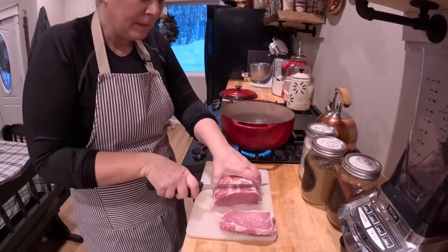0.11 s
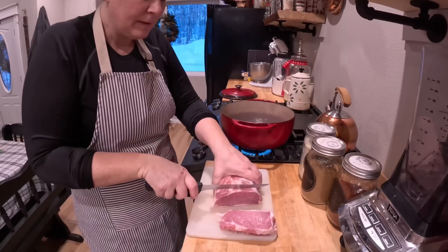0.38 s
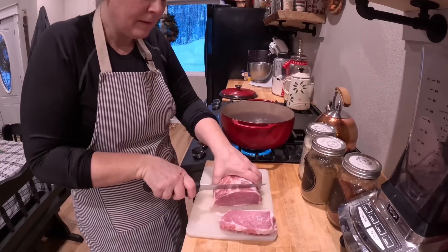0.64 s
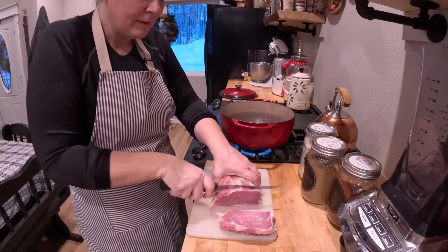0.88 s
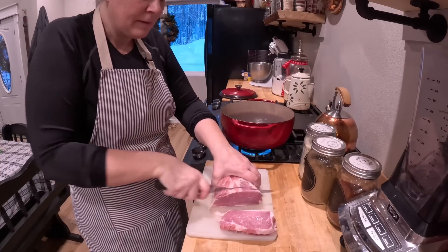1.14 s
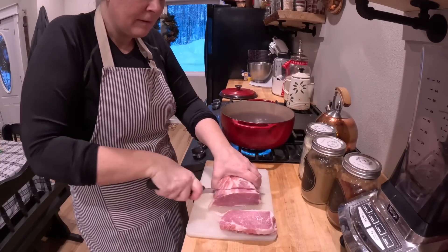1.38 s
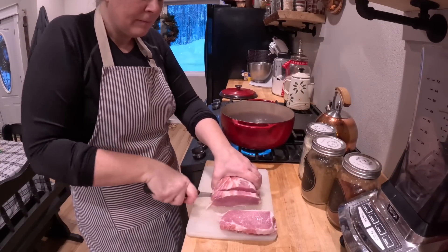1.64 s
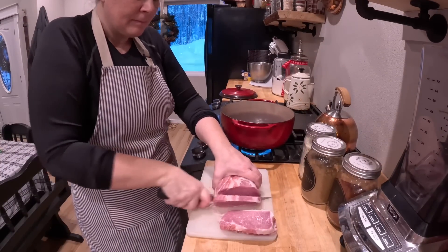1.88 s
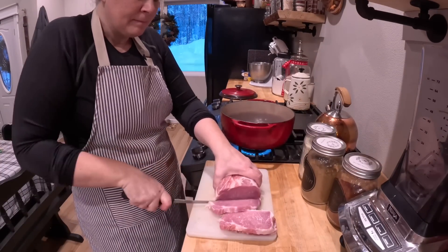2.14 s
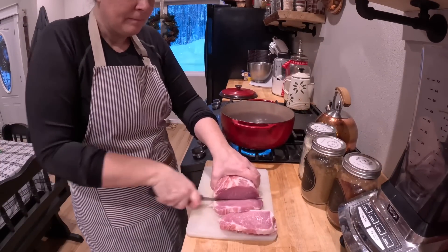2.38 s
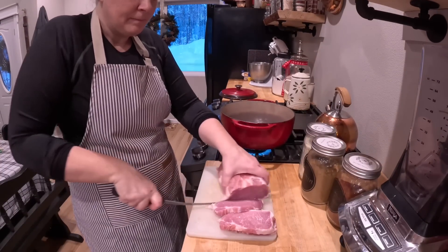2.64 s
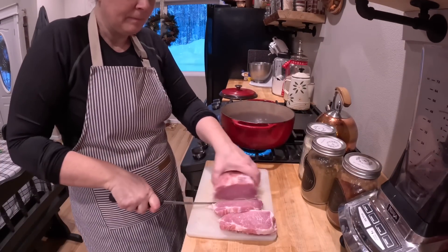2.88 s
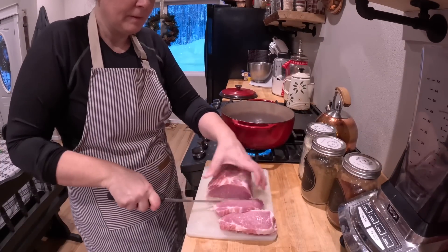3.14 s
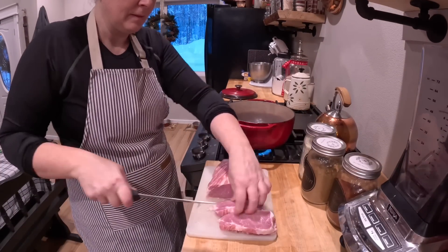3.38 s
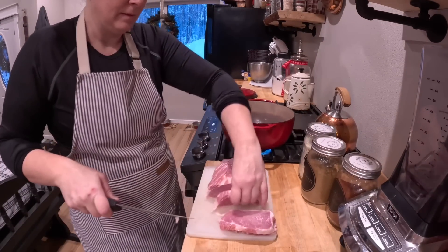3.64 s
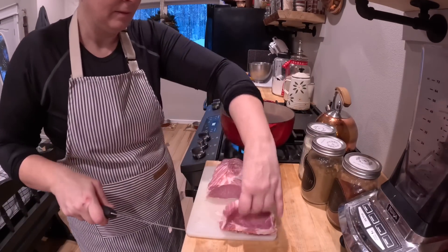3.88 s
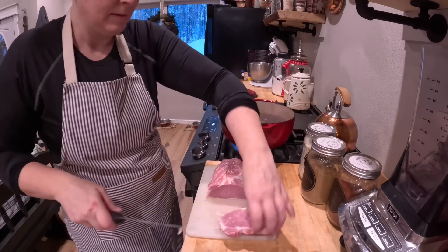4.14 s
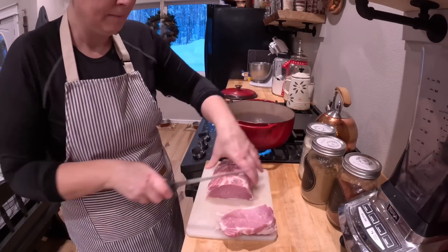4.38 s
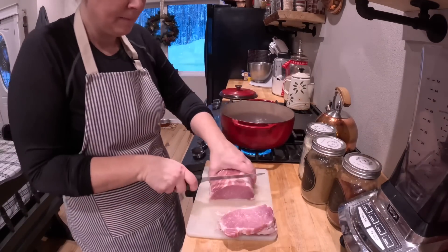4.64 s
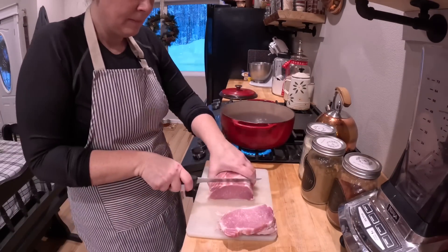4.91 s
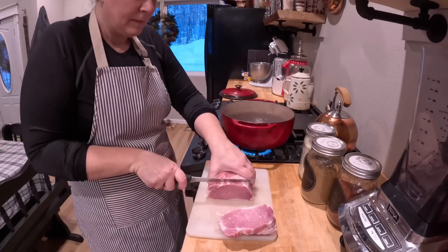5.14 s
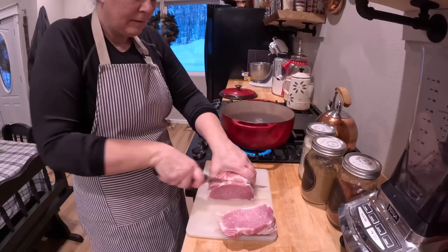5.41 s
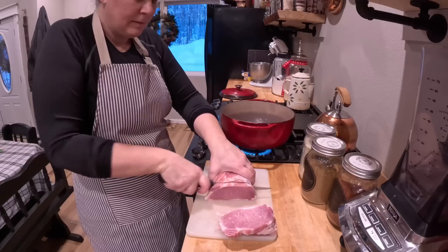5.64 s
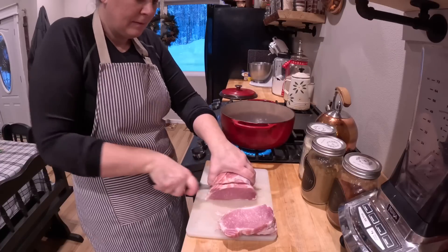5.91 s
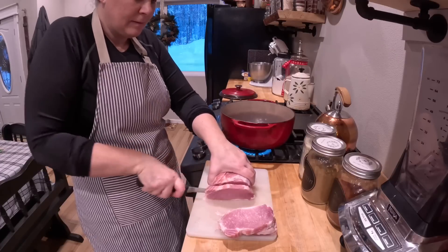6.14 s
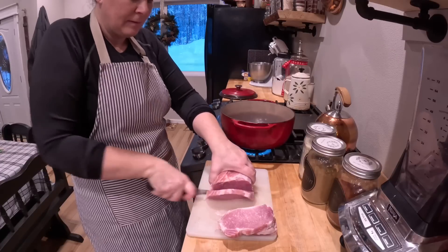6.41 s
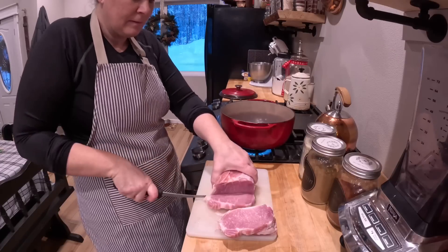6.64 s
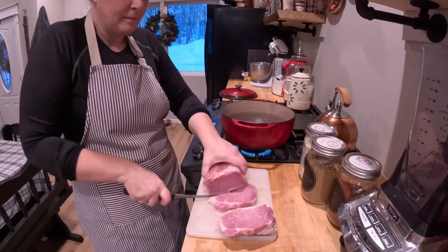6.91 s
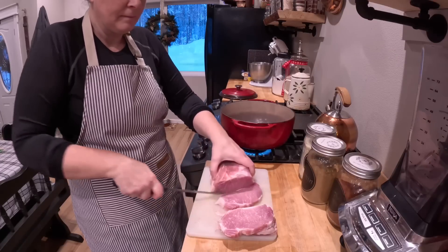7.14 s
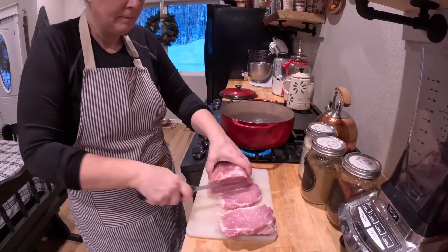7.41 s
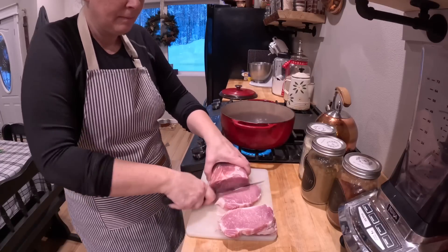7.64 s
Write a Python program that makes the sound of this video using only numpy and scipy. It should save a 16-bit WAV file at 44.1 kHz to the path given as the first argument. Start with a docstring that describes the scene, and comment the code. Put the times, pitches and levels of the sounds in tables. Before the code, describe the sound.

A low, unsteady gas-flame rush and faint fridge hum run throughout a small, lightly reverberant kitchen, heard close through a small microphone with dull highs. One wet tick comes at 0.1 s. From 0.7 s a knife saws raw meat in strokes about six per second, hissing softly, growing louder and scrapier; light blade taps at 1.75 s, thin wavering squeaks around 1.9-2.0. At 2.34 a hard chop cracks on the plastic board with a scraping skid, then wet snaps pop from 2.5 to 2.9. Quiet handling and small sticky ticks fill 3-5 s. Sawing resumes at 5.2 as a narrower rasp, reaching the board near 6.2; a heavy, duller chop hits at 6.27, with light ringing taps at 6.37 and short scrapes. Strong wet pops cluster at 6.6-6.9, thinning to 7.3. A fresh stroke leads to a softer, duller chop at 7.66, ending on scraping and squeaks.

```python
"""A gas flame rushes over a fridge's hum while fingers shift raw meat; wet snaps pop as it peels from the blade.
A kitchen knife saws in short strokes, scrapes and squeaks on the plastic board, taps it and chops down on it.
Flame and friction are filtered noise, hum and squeaks are sines; blows ring decaying board modes,
and snaps are short decaying tones with noise. A small kitchen answers all but flame and hum."""
import sys
import numpy as np
from scipy import signal
from scipy.fft import rfft, irfft, next_fast_len
from scipy.io import wavfile
from scipy.ndimage import uniform_filter1d, map_coordinates

SR = 44100
rng = np.random.default_rng(int(sys.argv[2]) if len(sys.argv) > 2 else 0)


def waveform_to_disk(signal):
    """Save audio, clipped to [-1, 1], as 16-bit WAV at the path in sys.argv[1]."""
    frames = np.transpose(np.atleast_2d(signal))
    scaled = np.clip(frames, -1, 1) * 32767
    samples = np.round(scaled).astype(np.int16)
    wavfile.write(sys.argv[1], SR, samples)


def convert_level_to_amplitude(level_db):
    """Map a level in decibels to its linear amplitude factor."""
    exponent = np.asarray(level_db, float) / 20
    return 10 ** exponent


N = 343098

# Response of the small microphone. Each row: frequency in Hz, gain in dB.
MIC_RESPONSE = [(40, -18.5), (100, 1), (6500, -2), (8000, -9), (8900, -21.5), (9100, -43.5), (9350, -13.5),
                (10300, -13), (11200, -22), (13000, -24.5), (15500, -42)]


def unit(x):
    """Scale to rms 1."""
    return x / np.sqrt(np.mean(x ** 2) + 1e-20)


def along(points, hz):
    """Interpolate (Hz, value) points on a log frequency axis."""
    point_hz, value = np.transpose(points)
    return np.interp(np.log(hz + 1), np.log(point_hz + 1), value)


def curves(rows):
    """One value per sample for each column after the time in seconds."""
    s, *columns = np.transpose(rows)
    return [np.interp(np.arange(N) / SR, s, column) for column in columns]


def wobble(knots_per_s):
    """A smooth random curve through normally distributed knots."""
    knots = rng.standard_normal(int(N * knots_per_s / SR) + 4)
    return map_coordinates(knots, [np.arange(N) * knots_per_s / SR])


def filtered(x, response):
    """Apply a complex response of frequency in Hz."""
    size = next_fast_len(N + SR // 2)
    return irfft(rfft(x, size) * response(np.fft.rfftfreq(size, 1 / SR)), size)[:N]


def high_pass(x, hz):
    """A small object radiates little below hz."""
    return signal.sosfilt(signal.butter(4, hz, "high", fs=SR, output="sos"), x)


def resonances(peaks):
    """Gain of steep-flanked peaks, each a squared resonator, whose powers add."""
    def gain(f):
        power = 0
        for hz, width_hz, db in peaks:
            resonator = np.abs(f * width_hz / (hz * hz - f * f + 1j * f * width_hz))
            power = power + convert_level_to_amplitude(db) ** 2 * resonator ** 4
        return np.sqrt(power)
    return gain


def friction(peaks, grain_db, patchy_db):
    """Noise that jumps fibre by fibre and tears in patches, through resonances; rms 1."""
    z = signal.stft(rng.standard_normal(N), nperseg=256)[2]
    field = uniform_filter1d(rng.standard_normal(z.shape), size=4, axis=0)
    field = uniform_filter1d(field, size=8, axis=1)
    torn = signal.istft(z * convert_level_to_amplitude(patchy_db * unit(field)), nperseg=256)[1][:N]
    grain = convert_level_to_amplitude(grain_db * wobble(600))
    return unit(filtered(grain * torn, resonances(peaks)))


def stove():
    """The gas flame's noise rushes unsteadily over the fridge's steady low sines."""
    # Flame spectrum as heard through the microphone. Each row: frequency in Hz, relative density in dB per Hz.
    flame_colour = [(24, -56), (40, -24.5), (145, 1.5), (182, -2), (313, -1.5), (401, 0.5), (443, 2),
                    (478, -1.5), (676, -7.5), (933, -14), (1200, -15), (1350, -14), (2010, -16),
                    (3800, -29), (6300, -32), (6950, -31.5), (8500, -50), (11600, -49.5), (15000, -70)]
    # Flame loudness. Each row: time in seconds, level in dB.
    flame_level = [(0, -52), (2, -49.5), (4, -51.5), (4.7, -48), (6, -50.5), (7.78, -50.5)]
    # Fridge hum ahead of the microphone. Each row: frequency in Hz, rms level in dB.
    fridge_hum = [(59, -57.5), (118, -69)]

    def colour(hz):
        return convert_level_to_amplitude(along(flame_colour, hz) - along(MIC_RESPONSE, hz))

    level_db = curves(flame_level)[0] + 1.5 * wobble(9)
    out = unit(filtered(rng.standard_normal(N), colour)) * convert_level_to_amplitude(level_db)
    t = np.arange(N) / SR
    for hz, db in fridge_hum:
        out += np.sqrt(2) * convert_level_to_amplitude(db + 0.28 * wobble(2.36)) * np.sin(2 * np.pi * hz * t)
    return out


def strokes():
    """The blade speeds up and slows in every stroke: gains of hiss, scrape, fizz and shudder."""
    # Saw strokes. Each row: start in seconds, length in seconds, hiss through meat in dB,
    # scrape on board in dB, fizz over the hiss in dB.
    saw_strokes = [(0.738, 0.14, -50, -69, -9), (0.875, 0.19, -54, -63, -3), (1.052, 0.17, -46, -53, -2),
                   (1.205, 0.17, -47.5, -62, -5), (1.34, 0.17, -44, -54.5, -11), (1.489, 0.2, -45, -50, -6),
                   (1.624, 0.2, -41, -44, -10), (1.819, 0.16, -39.5, -38, -13),
                   (1.886, 0.2, -42, -44.5, -11), (2.23, .13, -42.5, -43.5, -12),
                   (2.453, .22, -39, -39, -12.5), (2.625, 0.11, -51.5, -49, -17),
                   (3.566, 0.097, -62.5, -63, 6), (5.163, 0.18, -45, -58.5, -5),
                   (5.358, 0.17, -45, -55, -6.5), (5.504, .18, -41, -55, -5.5),
                   (5.658, 0.2, -44, -55, -0.5), (5.797, 0.22, -40, -51, -5.5), (5.983, 0.2, -44, -50, -6),
                   (6.174, 0.16, -40, -40.5, -9), (6.345, 0.089, -40.5, -41, -8),
                   (6.387, 0.13, -39.5, -47, -3.5), (6.469, .1, -37.5, -43, -10),
                   (6.529, 0.087, -39.5, -43, -9), (6.773, 0.26, -45, -46, -4), (7.016, 0.12, -57, -60, 1),
                   (7.196, .11, -68, -53, 2), (7.427, 0.28, -56.5, -62, 7), (7.663, 0.38, -40, -46, -2)]
    # Board skids and sudden scrapes, most just after a chop.
    # Each row: start in seconds, hold in seconds, scrape in dB, shudder in dB.
    board_skids = [(2.34, 0.1, -35.5, -32.5), (6.199, 0.05, -44, -48), (6.285, 0.047, -52, -43),
                   (7.683, 0.021, -45, -42)]
    # Fingers shifting the meat. Each row: time in seconds, hiss in dB.
    handling = [(0, -72.5), (.7, -73.5), (1, -69.5), (2.8, -58), (3, -64), (3.5, -64.5), (3.9, -72),
                (4.15, -69.5), (4.2, -63.5), (4.55, -67), (4.7, -73), (5.1, -65.5), (5.3, -66), (7, -64),
                (7.4, -64), (7.78, -56.5)]
    fastest_share, top_speed, speed_power = 0.51, 0.97, 1.56  # the hand holds speed steady above top_speed
    attack_s, fade_db_per_s = 0.0087, 161

    t, power = np.arange(N) / SR, np.zeros((4, N))
    bend = np.log(0.5) / np.log(fastest_share)
    for s, length_s, hiss_db, scrape_db, fizz_db in saw_strokes:
        span = slice(round(s * SR), round((s + length_s) * SR))
        progress = np.clip((t[span] - s) / length_s, 0, 1)
        swing = np.abs(np.sin(np.pi * progress ** bend))
        loudness = np.minimum(swing / top_speed, 1) ** speed_power
        shudder_db = -53 + 0.67 * (scrape_db + 48)
        levels_db = [[hiss_db], [scrape_db], [hiss_db + fizz_db], [shudder_db]]
        power[:, span] += (convert_level_to_amplitude(levels_db) * loudness) ** 2

    chatter_db = 2.5 * wobble(200)
    for s, hold_s, scrape_db, shudder_db in board_skids:
        fade_db = fade_db_per_s * np.maximum(t - s - hold_s, 0)
        slide = np.clip((t - s) / attack_s, 0, 1) * convert_level_to_amplitude(chatter_db - fade_db)
        power[[1, 3]] += (convert_level_to_amplitude([[scrape_db], [shudder_db]]) * slide) ** 2

    # handling: scrape and fizz in dB over its hiss
    power[:3] += convert_level_to_amplitude(curves(handling)[0] + np.array([[0], [4.5], [-5.5]])) ** 2
    return np.sqrt(power) * convert_level_to_amplitude(wobble(30))  # fibres catch


def ticks():
    """Gain that leaps for a few milliseconds whenever a fibre parts."""
    ticks_per_s, t60_s = 110, 0.006
    draw = rng.random((N, 2))
    leap = convert_level_to_amplitude(-3 - 2 * np.log(draw[:, 1] + 1e-3))
    parting = (draw[:, 0] < ticks_per_s / SR) * leap
    return 1 + signal.lfilter([1], [1, -convert_level_to_amplitude(-60 / (t60_s * SR))], parting)


def sawing():
    """The edge hisses through the meat, fizzes, drags on the board and shakes it."""
    # Resonances of the friction. Each row: frequency in Hz, resonator width in Hz, level in dB.
    open_cut = [(3140, 1200, 1.5), (4040, 1800, 3), (5500, 1150, -3.5), (6840, 3900, -8.5)]
    deep_cut = [(2700, 1200, -5), (3550, 770, 7.5), (4060, 530, 3.5), (5400, 1300, -5.5),
                (4960, 4900, -5.5), (7000, 1800, -11.5)]
    finest_fizz = [(9100, 3900, -3.5), (11100, 8800, 9)]
    board_drag = [(895, 1000, -0.5), (1320, 150, -5), (1600, 600, 5), (1950, 530, 0.5), (2500, 1050, 2.5),
                  (2680, 520, 0)]
    board_shudder = [(125, 61, -1.5), (241, 26, -14), (314, 48, 1.5), (414, 72, 2.5), (580, 133, 0.5)]  # the loaded board on the counter

    first = friction(open_cut, grain_db=-1.5, patchy_db=1.5)
    second = friction(deep_cut, grain_db=-0.5, patchy_db=3.0)
    t = np.arange(N) / SR
    buried = (t > 5.1) & (t <= 6.18)  # deep in the second slice the hiss narrows to a rasp
    hiss = np.where(buried, second, first)
    fizz = friction(finest_fizz, grain_db=2.5, patchy_db=2.5)
    tearing = unit(ticks())
    scrape = friction(board_drag, grain_db=0.5, patchy_db=3.0)
    shudder = friction(board_shudder, grain_db=3.0, patchy_db=3.5)
    return (strokes() * [hiss * tearing, scrape, fizz * tearing, shudder]).sum(axis=0)


def snaps():
    """A film of juice bursts: a broad pop, a ping of the blade and a sharp edge."""
    # Wet snaps. Each row: start in seconds, level in dB, pitch in Hz,
    # blade ping in dB over the pop, relative bright edge in dB.
    wet_snaps = [(0.0716, -37, 4640, -13, -45), (0.904, -36, 4430, -13, -19.5),
                 (2.5233, -31, 4250, -8, -17), (2.601, -43, 4040, 13, 4.5), (2.637, -27.5, 2890, -8, -24),
                 (2.657, -17.5, 3060, -4, -49), (2.7825, -24.5, 4370, -28, -23),
                 (2.838, -38.5, 2740, -9, -14.5), (2.8957, -21.5, 3350, -34, -43),
                 (3.077, -46.5, 4050, -17, -8), (3.3917, -56, 2720, -18, -1), (3.446, -53, 3500, -11, -5),
                 (3.5904, -43, 4240, -11, -19), (3.611, -45, 4200, -20, -6.5), (3.638, -35, 4220, -19, -20),
                 (3.698, -50, 4560, -15, -11), (4.4766, -52, 2900, -13, -8), (4.532, -45, 7100, -17, -8),
                 (4.936, -56, 2790, -9, -5.5), (5.0003, -51, 2720, -12, -11), (5.12, -52.5, 6500, -20, -5),
                 (5.176, -38, 6040, -18, -20), (6.612, -36, 2700, -3, -13), (6.6361, -23, 2880, -9, -24.5),
                 (6.684, -21, 2700, -6.5, -37), (6.7494, -17, 2830, -16, -32.5),
                 (6.798, -43, 3520, -11, -10.5), (6.8663, -37, 3140, 0, -15), (6.992, -32, 2680, -19, -26),
                 (7.0846, -41.5, 6840, -19, -6.5), (7.2407, -39, 2800, -11, -24),
                 (7.266, -30.5, 4420, -27, -34), (7.6376, -37, 2710, -11, -17)]
    out, t = np.zeros(N + SR), np.arange(SR // 20) / SR
    onset = 1 - np.exp(-t / 0.00014)
    noises = rng.standard_normal((len(wet_snaps), len(t)))
    for (s, db, hz, ping_db, edge_db), noise in zip(wet_snaps, noises):
        tone = np.sin(2 * np.pi * hz * t)
        pop = convert_level_to_amplitude(-60 * t * hz / 16) * tone  # down 60 dB in 16 cycles
        spray = 0.9 * convert_level_to_amplitude(-60 * t / 0.037) * tone * uniform_filter1d(noise, size=12)
        blade = convert_level_to_amplitude(ping_db - 60 * t / 0.027) * np.sin(2 * np.pi * 2180 * t)
        crisp = np.diff(uniform_filter1d(noise[::-1], size=3), prepend=0)
        bright = convert_level_to_amplitude(edge_db + 16.5 - 60 * t / 0.045) * crisp  # raised: the microphone dulls it
        out[round(s * SR):][:len(t)] += convert_level_to_amplitude(db) * onset * (pop + spray + blade + bright)
    return high_pass(out[:N], 2040)


def contacts():
    """Every touch of blade on board as (s, dB, thud, knock, ring, crack); a chop is tip, heel, bounce."""
    # Light taps of the blade. Each row: start in seconds, level in dB, extra ring in dB, extra crack in dB.
    light_taps = [(1.7505, -24, 6, -3), (1.761, -22, -14, -13), (6.368, -26, 9, -8), (6.374, -31, 6, 0),
                  (6.38, -32, 12, 1), (6.992, -28, -15, -23)]
    # Chops. Each row: start in seconds, tip in dB, heel in dB, hardness in dB, place in dB (ring against knock).
    chops = [(2.337, -16.5, -7.5, 10, -1.5), (6.2651, -23.5, -4.5, -2, 4), (7.6597, -19.5, -13, -8.5, -6.5)]
    # shares in dB: thud, knock, ring, crack
    tip, heel = (-2, -9, 14, -3), (-6.5, -3.5, 0.5, -24.5)
    bounce, tap = (3, -10, -5, -24), (-11, -1.5, 0.5, -4)
    heel_delay_s, bounce_delay_s = 0.003515, 0.0235  # after the tip

    rows = [(s, db, *np.add(tap, [0, 0, ring, crack])) for s, db, ring, crack in light_taps]
    for s, tip_db, heel_db, hard, place in chops:
        rows.append((s, tip_db, *np.add(tip, [0, 0, place, hard])))
        rows.append((s + heel_delay_s, heel_db, *np.add(heel, [0, -place, place, hard])))
        rows.append((s + bounce_delay_s, heel_db - 9.5, *bounce))
    return rows


def knocks():
    """Each blow rings the board; its hardness and place set how the modes share it."""
    # Modes of the board on its counter. Each row: frequency in Hz, level in dB, t60 in seconds.
    board_modes = [(62.4, -9, 0.11), (150.5, -13.5, 0.12), (183.6, -7, 0.14), (234, 0.5, 0.033),
                   (290.5, -13.5, 0.088), (327.8, -1.5, 0.053), (416, -1, 0.037), (513.5, -2.5, 0.039),
                   (647, -2.5, 0.036), (773, -16, 0.11), (830, -11, 0.035), (1062, -1, 0.02),
                   (1260, -6.5, 0.05), (1575, -5.5, 0.04), (2093, 4.5, 0.02), (2526, 8.5, 0.011),
                   (2753, 4, 0.016), (3740, -8, 0.014), (5200, -12, 0.0087)]
    out, t = np.zeros(N + SR), np.arange(SR // 2) / SR
    hz, level_db, t60_s = np.transpose(board_modes)[:, :, None]
    blows = contacts()
    places = rng.standard_normal((len(blows), len(board_modes), 1))
    for (s, db, thud, knock, ring, crack), place in zip(blows, places):
        share_db = along([(170, thud), (335, 0), (580, knock), (830, ring), (1900, crack)], hz) + place
        press_s = 0.0004 * convert_level_to_amplitude(-0.45 * min(crack, 0))  # dull blows are cushioned and press longer
        onset = 1 - np.exp(-t / press_s)
        decay = convert_level_to_amplitude(level_db + share_db - 60 * t / t60_s)
        modes = decay * onset * np.sin(2 * np.pi * hz * (1 + 0.005 * place) * t)
        out[round(s * SR):][:len(t)] += convert_level_to_amplitude(db) * modes.sum(axis=0)
    return high_pass(out[:N], 73)


def squeaks():
    """Stick-slip locks to a mode for a moment: a wavering, unsteady tone."""
    # The edge squeaks on the plastic. Each row: start in seconds, end in seconds,
    # start frequency in Hz, end frequency in Hz, level in dB.
    edge_squeaks = [(1.863, 1.913, 1700, 1950, -42), (1.891, 1.919, 2500, 2530, -40.5),
                    (1.975, 2.032, 1628, 1540, -38.5), (1.95, 2.05, 2500, 2500, -44),
                    (6.449, 6.554, 1693, 1770, -47), (6.9, 6.98, 1600, 1660, -52),
                    (6.92, 6.98, 2260, 2320, -49), (7.685, 7.745, 1736, 1700, -41),
                    (7.752, 7.778, 2010, 2310, -38)]
    out, t = np.zeros(N), np.arange(N) / SR
    waver, flutter_db = 0.03 * wobble(200), 4 * wobble(250)
    for start_s, end_s, start_hz, end_hz, db in edge_squeaks:
        progress = np.clip((t - start_s) / (end_s - start_s), 0, 1)
        hz = (start_hz + (end_hz - start_hz) * progress) * (1 + waver)
        swell = np.sqrt(np.abs(2 * np.sin(np.pi * progress)))
        out += swell * convert_level_to_amplitude(db + flutter_db) * np.sin(2 * np.pi * np.cumsum(hz) / SR)
    return out


def kitchen(x):
    """Each frequency of the room's answer dies at its own speed."""
    # Reverberation. Each row: frequency in Hz, t60 in seconds.
    room_decay = [(100, 0.77), (400, 0.74), (1500, 0.71), (4000, 0.21), (10000, 0.43)]
    hz, t, z = signal.stft(rng.standard_normal(SR), SR, nperseg=256)
    decay = convert_level_to_amplitude(-60 * t / along(room_decay, hz)[:, None])
    tail = signal.istft(z * decay, SR, nperseg=256)[1]
    delayed = np.pad(x, (250, 0))  # samples
    return signal.fftconvolve(delayed, tail / np.linalg.norm(tail))[:N]


def scene():
    """Board sounds near the microphone with their room, over the stove and fridge."""
    blows, wet, edge = knocks(), snaps(), sawing() + squeaks()
    room = convert_level_to_amplitude(-12.5) * kitchen(blows) + convert_level_to_amplitude(-11.5) * kitchen(wet) + convert_level_to_amplitude(-10.0) * kitchen(edge)
    return (blows + wet + edge + room + stove())[None]


def top_cut(x):
    """Nothing passes above the cut-off."""
    return signal.sosfilt(signal.butter(12, 15610, fs=SR, output="sos"), x)


def record(dry):
    """The input stage rounds off peaks; the small microphone is dull above 7 kHz, with a notch near 9 kHz."""
    ceiling = 1.1
    rounded = dry[0] / (1 + (dry[0] / ceiling) ** 4) ** 0.25
    mix = filtered(rounded, lambda hz: convert_level_to_amplitude(along(MIC_RESPONSE, hz)))[None]
    return top_cut(mix)


dry = scene()
out = record(dry)
waveform_to_disk(out)
```